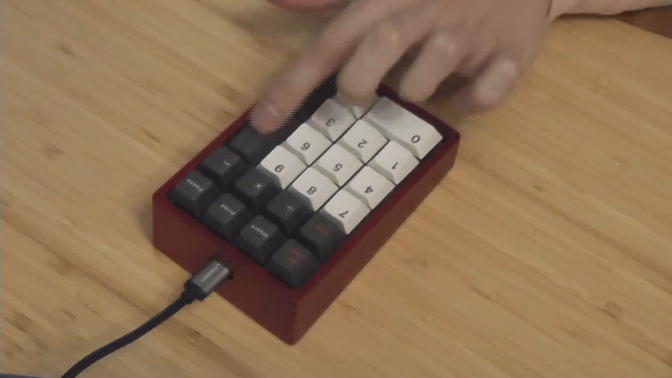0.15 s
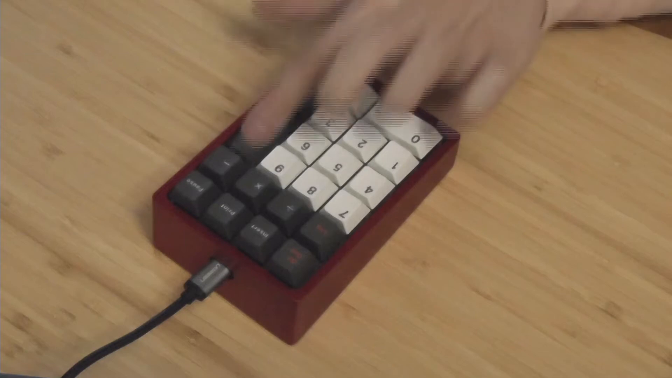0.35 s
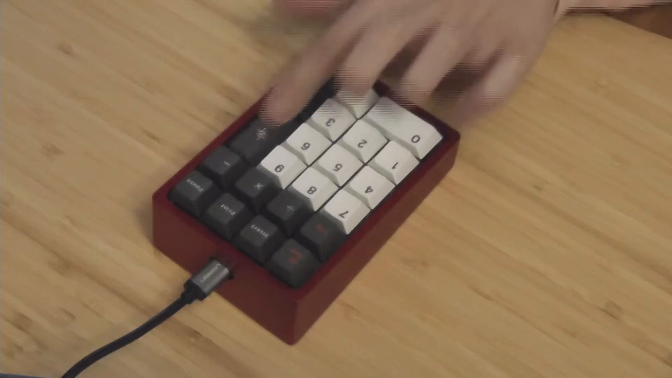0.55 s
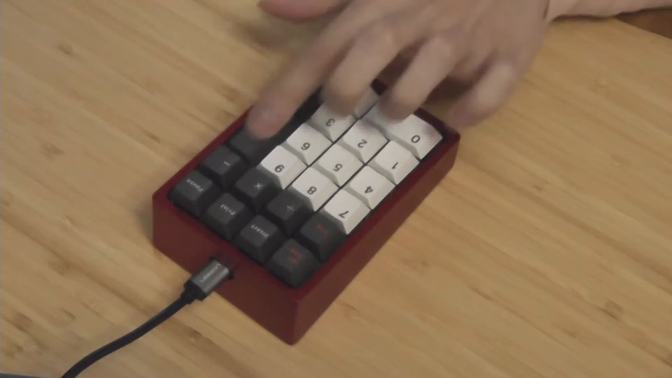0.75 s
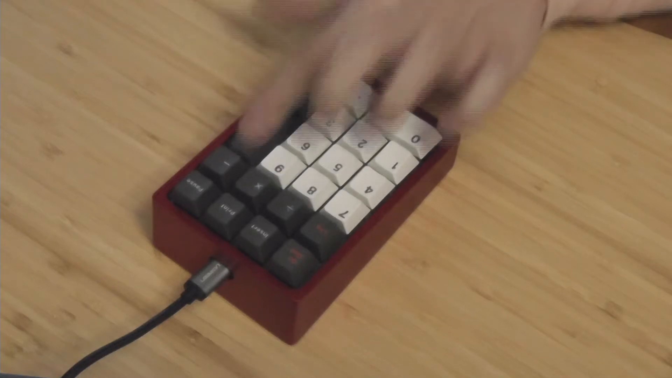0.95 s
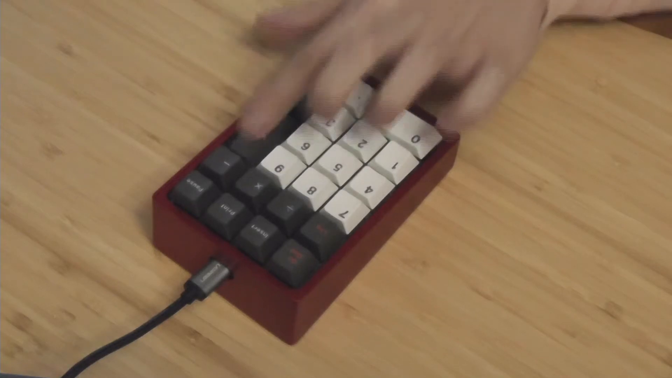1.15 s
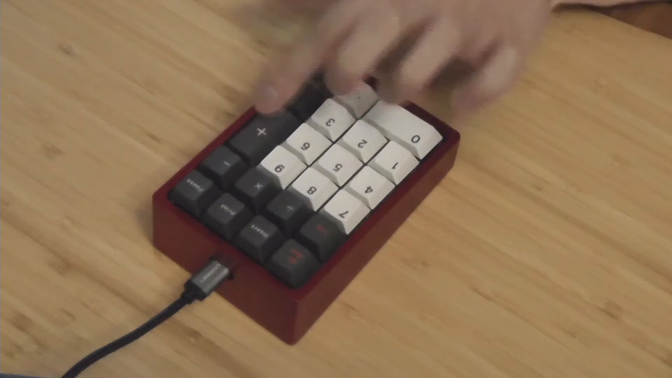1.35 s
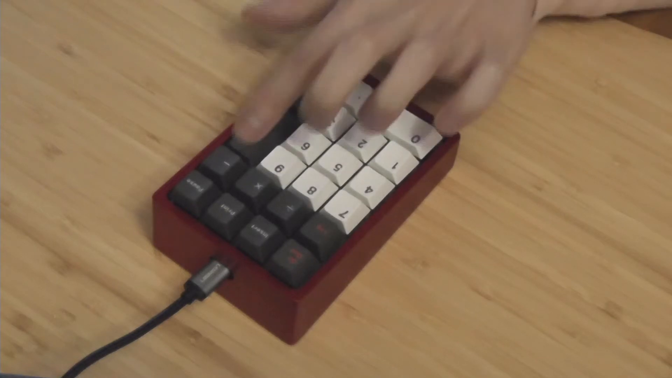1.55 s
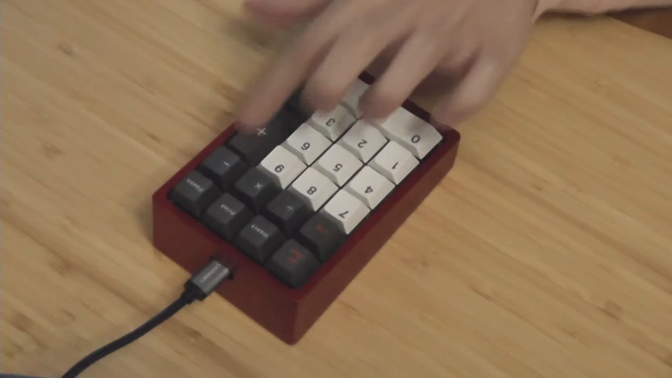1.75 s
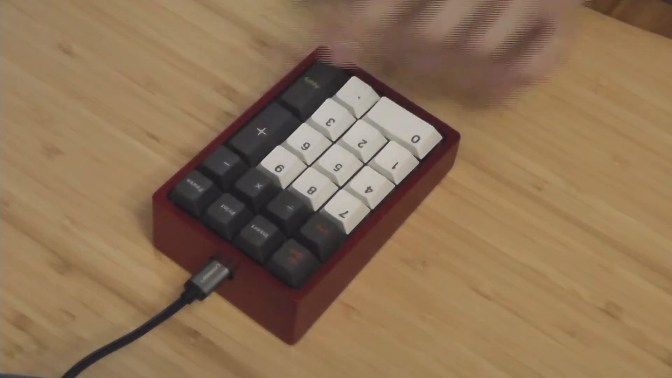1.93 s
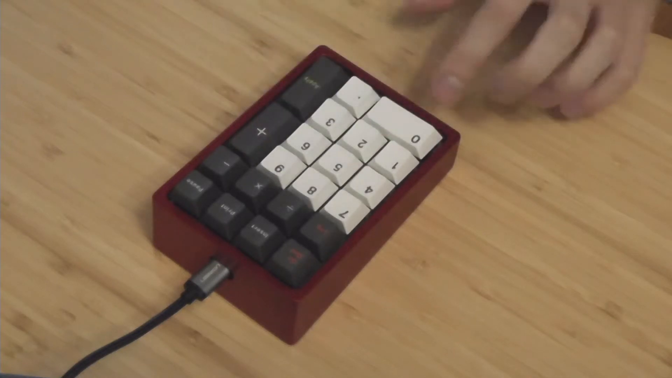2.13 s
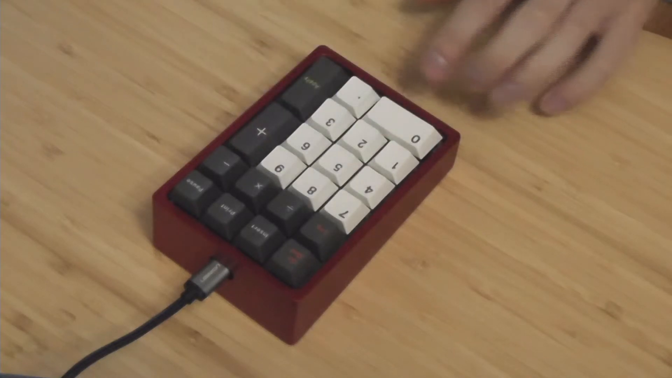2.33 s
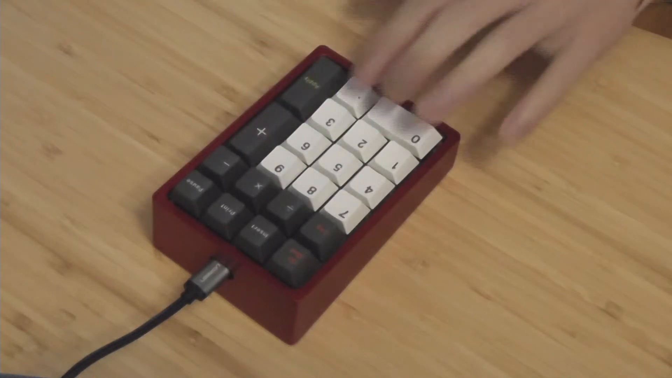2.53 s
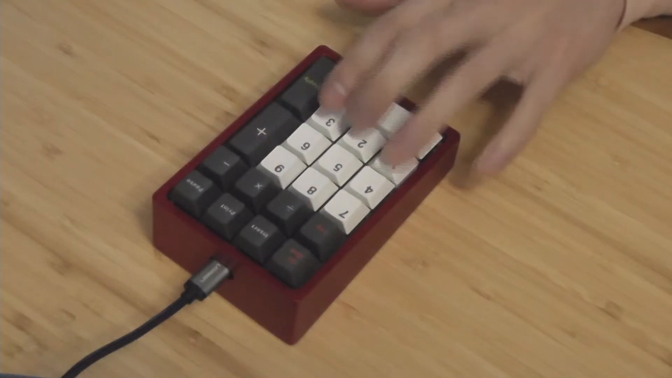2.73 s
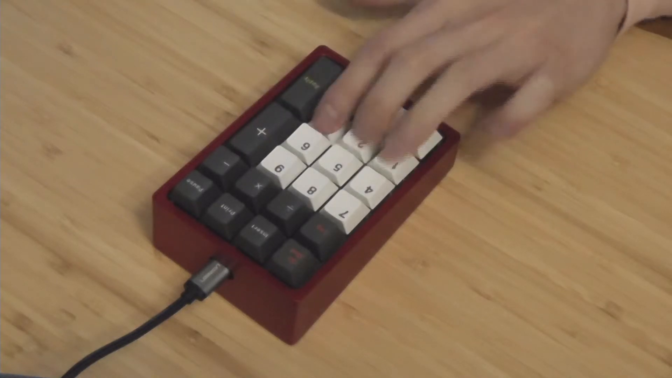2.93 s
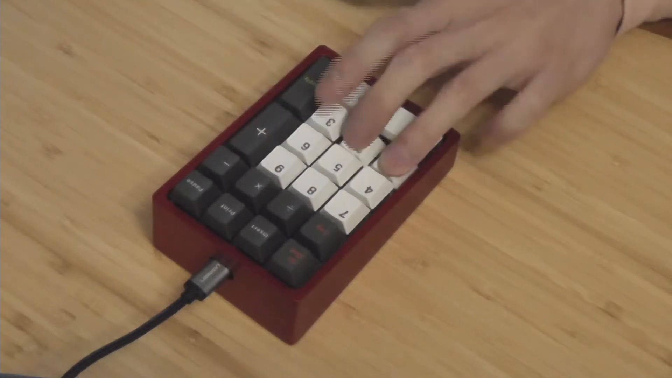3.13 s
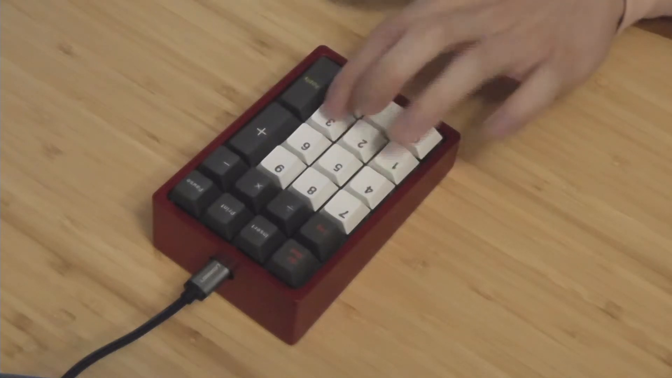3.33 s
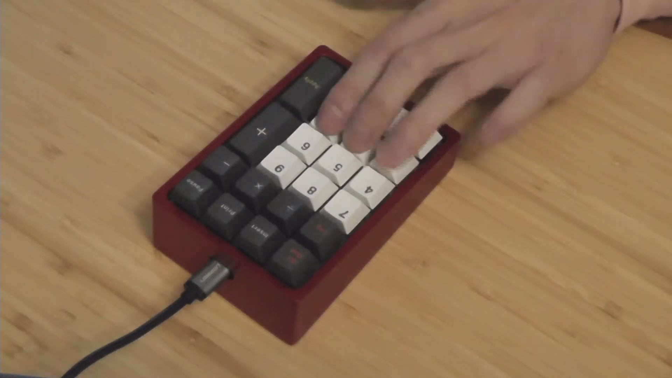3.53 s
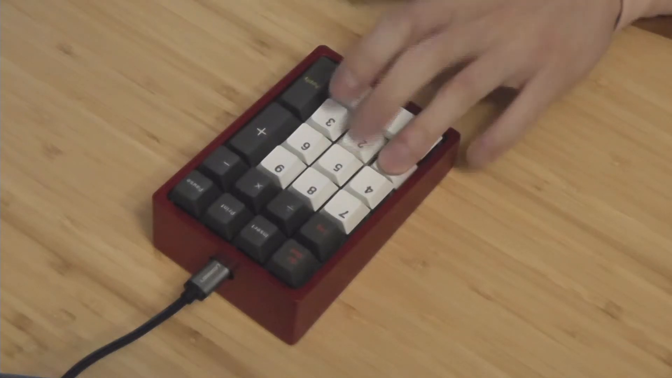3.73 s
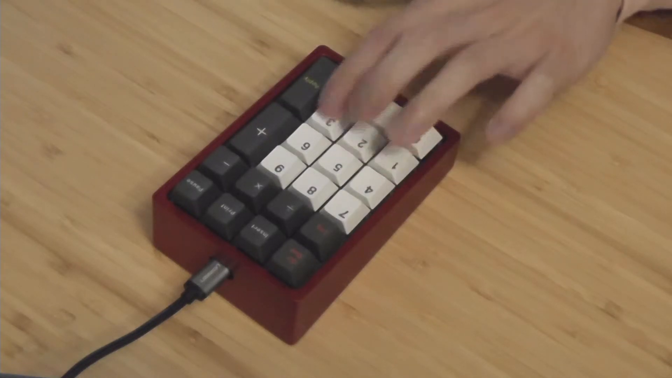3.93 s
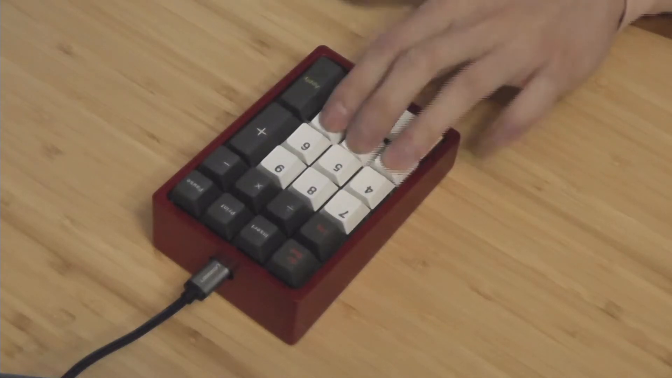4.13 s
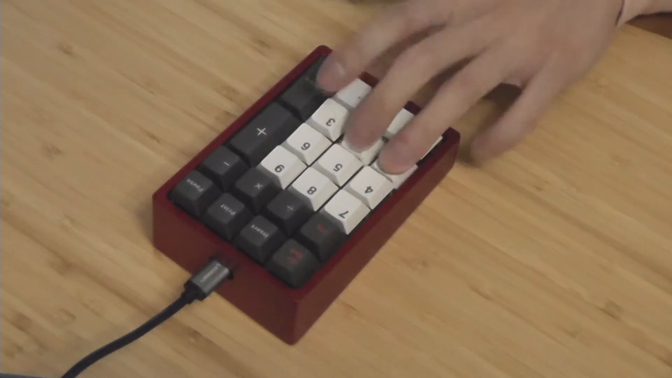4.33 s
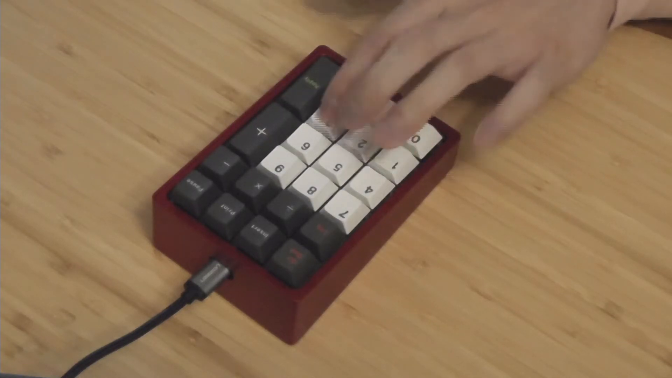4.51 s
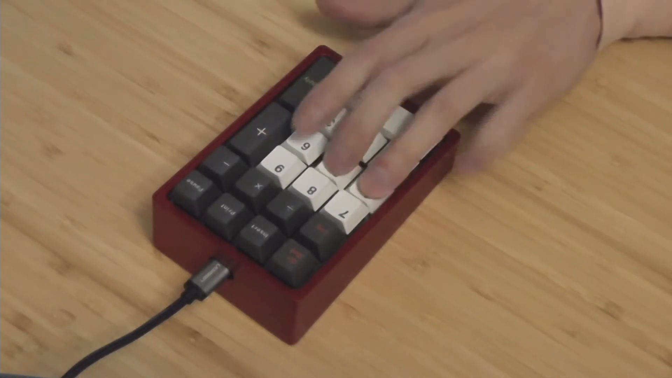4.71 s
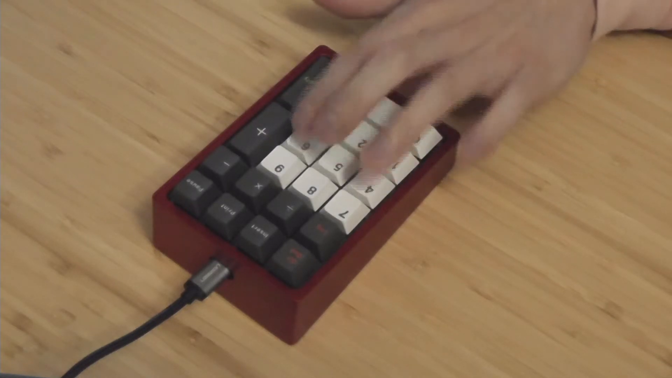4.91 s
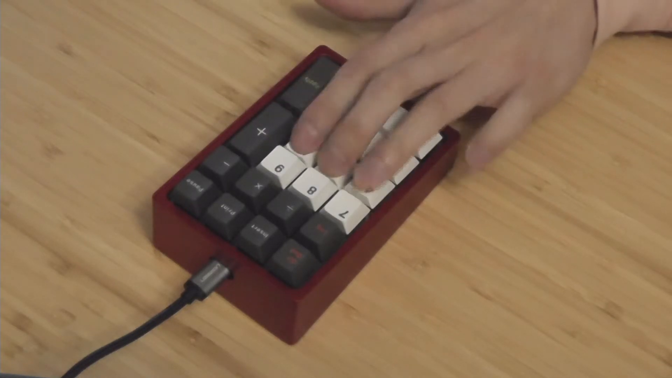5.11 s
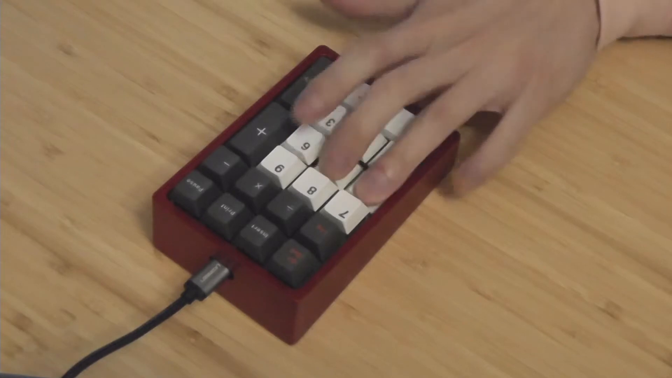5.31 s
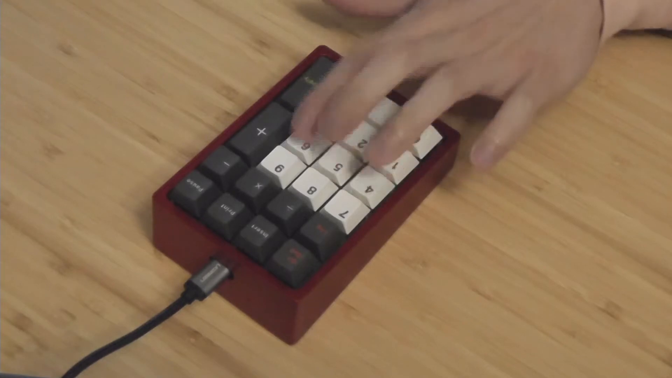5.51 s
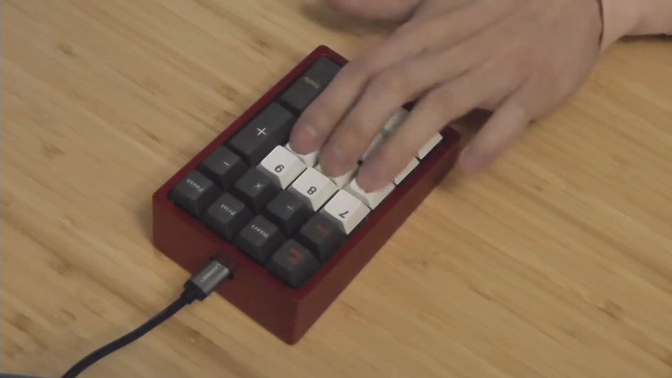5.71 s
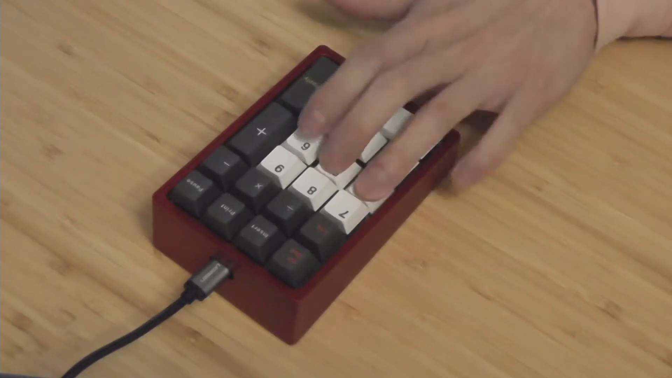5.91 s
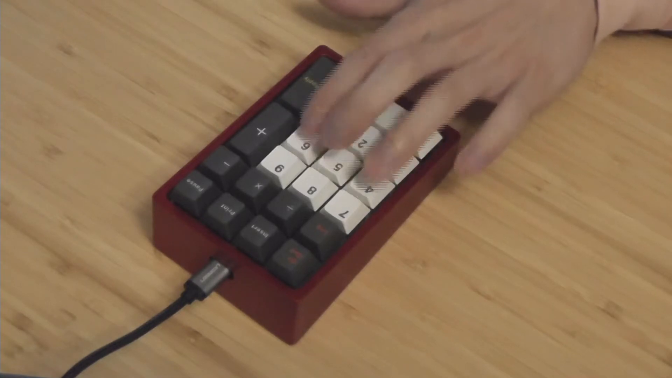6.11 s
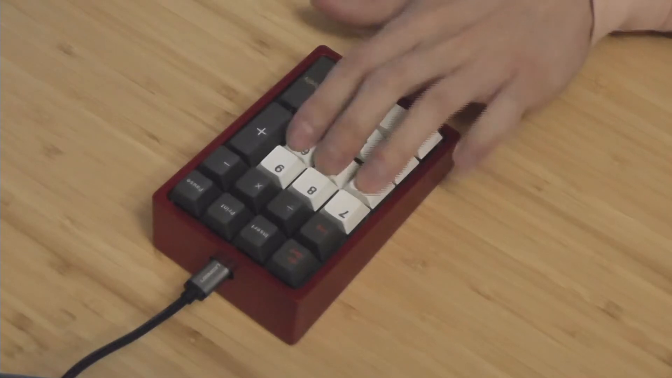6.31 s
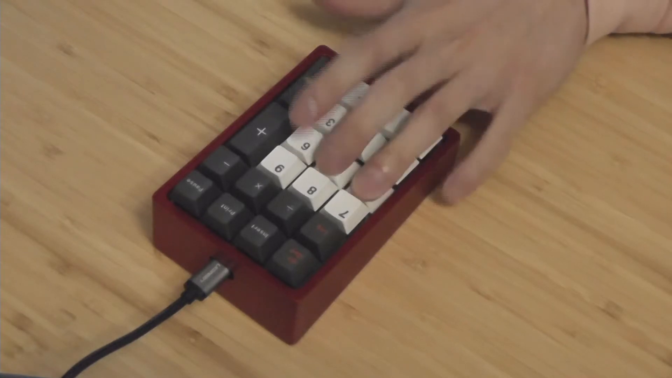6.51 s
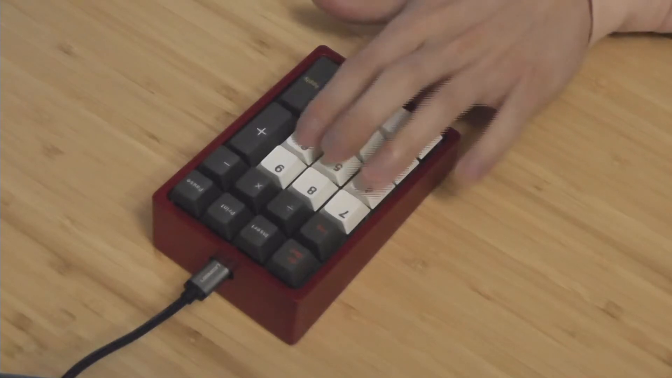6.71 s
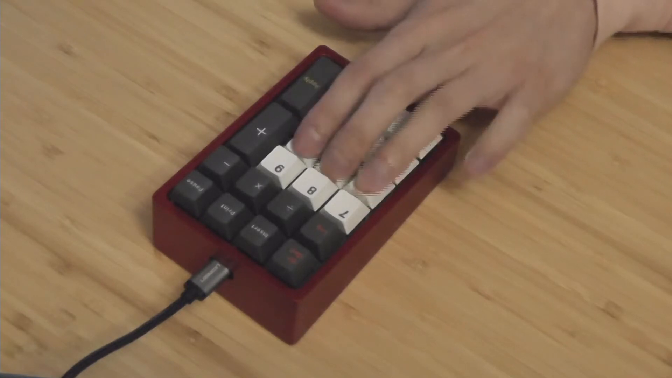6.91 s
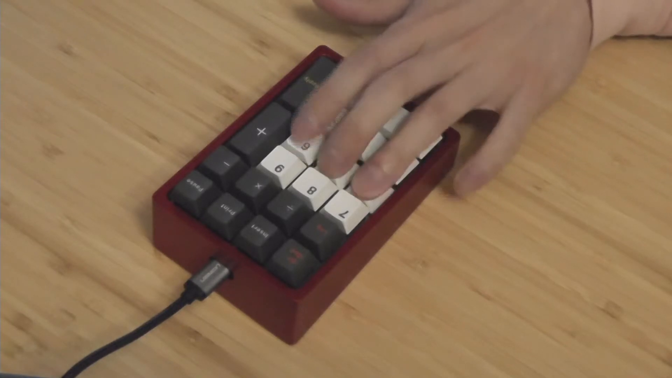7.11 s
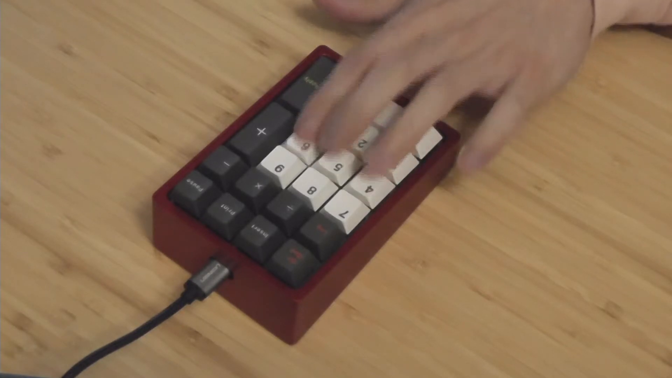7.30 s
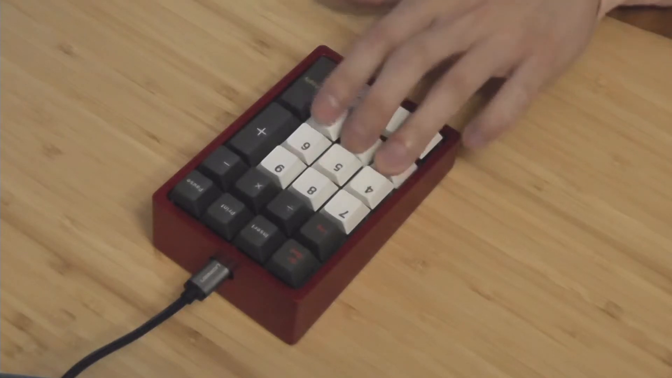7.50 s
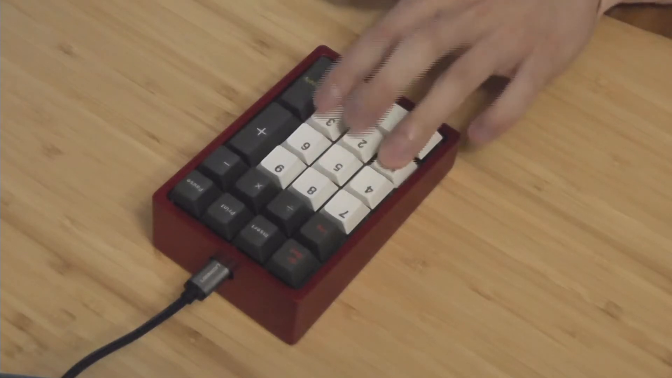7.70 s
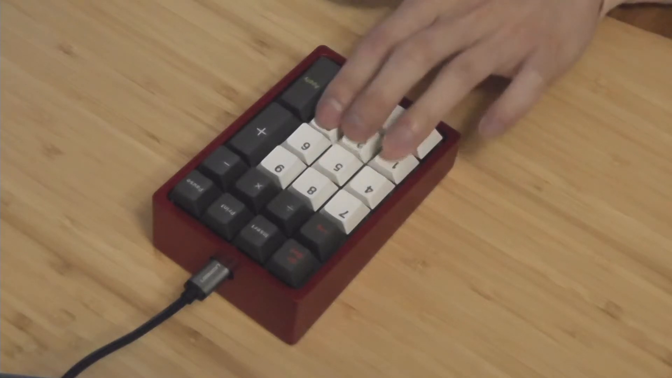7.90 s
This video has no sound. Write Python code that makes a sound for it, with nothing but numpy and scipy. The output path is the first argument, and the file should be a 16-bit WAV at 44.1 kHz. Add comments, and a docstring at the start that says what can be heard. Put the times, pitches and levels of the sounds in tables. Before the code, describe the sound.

Close typing on a mechanical keypad in a small, quiet room. It opens with a burst of loud, slightly rattly clacks from a single large key, then stops for a moment. Softer, irregular keystrokes follow in a near-continuous stream, easing off gradually. The strokes carry tiny switch ticks and faint spring pings, while the wooden desk adds soft knocks and a low rumble in the microphone.

```python
"""The wide plus key of a mechanical number pad clacks fast on a wooden desk; a pause, then runs of digits.
Each press and release is an impact that excites damped modes: the cap clacks, the switch ticks, its
spring pings and the desk thumps. The wide key's stabiliser buzzes. Around every stroke the fingertip
rubs and the case murmurs, more after harder strokes, and the digit keys' coils shimmer.
The desk shakes the stereo microphone; a near wall and a small room reflect the sound."""
import sys
import numpy as np
from scipy import signal
from scipy.fft import rfft, irfft, next_fast_len
from scipy.io import wavfile
from scipy.ndimage import uniform_filter1d, map_coordinates

SR = 44100
rng = np.random.default_rng(int(sys.argv[2]) if len(sys.argv) > 2 else 0)


def generate_wav(sig):
    """Save sig (samples, or channels by samples) to the path in sys.argv[1] as 16-bit PCM at SR."""
    pcm = np.round(np.clip(np.atleast_2d(sig).T, -1, 1) * 32767).astype(np.int16)
    wavfile.write(sys.argv[1], SR, pcm)


N = 350595
SIZE = 8192  # samples in one contact or impulse response
T = np.arange(SIZE) / SR
HZ = np.fft.rfftfreq(SIZE, 1 / SR)
TOP_HZ = 16300
USUAL_DB = -46  # a middling stroke

# Key contacts, down and up. Each row: start in seconds, cap level in dB, cap pitch in Hz,
# then switch, spring and desk thump levels in dB. Levels in all tables are relative.
PLUS_CONTACTS = [(0.0146, -54.5, 2610.0, -40, -62, -43), (0.0285, -36, 1930, -43.5, -55.5, -41.0),
                 (0.1148, -30, 2560, -33.5, -53, -44), (0.177, -37, 2110.0, -43.5, -61, -46),
                 (0.2594, -29, 2560, -28, -39.5, -36), (0.3007, -45.5, 2350, -66, -76.5, -59),
                 (0.3217, -36, 2140, -45.5, -60.5, -45.5), (0.3888, -28, 2440, -28.5, -46, -38),
                 (0.4588, -36, 2500, -43.5, -55, -42.5), (0.5477, -27, 2760, -28.5, -43, -36.5),
                 (0.6242, -41, 1960, -52.5, -74, -67), (0.68, -48.5, 2600, -44.5, -59.5, -51.5),
                 (0.7006, -37.5, 2060, -41.5, -58.5, -45), (0.7692, -42.5, 1890, -40, -66, -42),
                 (0.8589, -28.5, 2500, -22.5, -38.5, -33.5), (0.9234, -43.5, 2100, -53, -71.5, -67.5),
                 (0.9852, -48.5, 2210.0, -47, -53.5, -44), (0.9993, -34.5, 2200, -37.5, -52.5, -43.5),
                 (1.1565, -36, 2400, -58, -73.5, -47.5), (1.2283, -35, 2550, -36.5, -50.0, -43),
                 (1.3087, -30, 2320, -36.5, -44.5, -35.5), (1.382, -51, 1663, -56.5, -85, -61),
                 (1.428, -50.5, 2300.0, -58, -75.5, -72), (1.5484, -38, 2090.0, -44, -63, -43.5),
                 (1.6294, -48, 2070, -50, -77.5, -61.5)]
DIGIT_CONTACTS = [(2.6385, -42.5, 2160, -48, -55.5, -57.5), (2.714, -56.0, 2220, -57, -61.5, -49.5),
                  (2.7623, -38, 2600, -35.5, -43.5, -42), (2.8196, -40.5, 2260, -49.5, -55, -71),
                  (2.8565, -43, 2300, -52.5, -69.5, -50.5), (2.952, -37.5, 2520, -38, -45.5, -40.0),
                  (3.017, -43.5, 3020, -44.0, -52.5, -62.5), (3.077, -49, 2380, -46.0, -49.5, -44.5),
                  (3.1069, -48.5, 2460.0, -60, -74.0, -73), (3.1438, -44.5, 1970, -57.5, -68, -88),
                  (3.1859, -45, 2350, -58.5, -74, -61), (3.2746, -42.5, 2600, -46.5, -53.0, -38.0),
                  (3.3284, -50.5, 2580, -48.5, -58, -43.5), (3.4003, -38.5, 2280, -37.5, -45.5, -40.5),
                  (3.4631, -40, 2710, -44, -50.5, -53.0), (3.502, -41, 2370, -52, -60, -56),
                  (3.5977, -43.5, 2520.0, -46, -58, -37), (3.6401, -40.5, 2170, -36.5, -45, -39),
                  (3.7037, -48, 2950, -44.5, -57.5, -47.5), (3.743, -53.5, 2160, -56, -65, -82),
                  (3.7764, -42.5, 2650, -52, -61, -73), (3.8097, -39.5, 2860, -43.5, -56, -45.5),
                  (3.9, -37, 2520, -37.0, -44, -42), (3.9848, -49, 2920, -64, -76, -54),
                  (4.0008, -57, 2110.0, -61.0, -74, -53), (4.0383, -49.5, 2380, -63.0, -71, -55.5),
                  (4.0741, -43, 2460, -52.5, -69.5, -56), (4.11, -41.5, 2350, -50.5, -58, -45),
                  (4.183, -38.5, 2360, -41, -48.5, -42.5), (4.2292, -48.5, 3060, -49, -78.5, -48),
                  (4.289, -43, 2880, -46, -54, -45.5), (4.332, -53.5, 2360, -68.0, -83.0, -53),
                  (4.3639, -45.5, 2670, -57, -99, -53.5), (4.4001, -45.5, 2270.0, -53.5, -68, -50),
                  (4.5603, -30.5, 2470, -35.5, -40.5, -37), (4.6569, -61, 2080.0, -71, -90, -46),
                  (4.6801, -60, 2270.0, -77, -86, -63.5), (4.7019, -54, 2100.0, -71, -82, -48),
                  (4.7456, -44, 2520.0, -48.5, -56, -59), (4.7842, -43, 2230, -50.5, -63.5, -60),
                  (4.8743, -45, 2750, -62, -77, -62), (4.91, -55.5, 1880.0, -69, -71, -53),
                  (5.0123, -49.5, 1950, -64, -74.5, -54), (5.0601, -46, 2110, -55, -69, -52.5),
                  (5.0977, -40.0, 2200, -44.5, -54.5, -67), (5.1707, -43.5, 2180, -57.5, -72, -50.5),
                  (5.2236, -57.5, 2720, -61, -61.5, -48), (5.2917, -59.5, 2530.0, -66, -64.5, -51.5),
                  (5.3314, -49, 2470, -64, -89, -57), (5.3628, -45, 2440, -50.5, -59.5, -61.5),
                  (5.3969, -42.5, 1900, -45.5, -55, -52), (5.4811, -33.5, 3240, -34.5, -42, -35.5),
                  (5.5666, -57, 2260.0, -72.5, -76.0, -72), (5.5912, -58.0, 2160.0, -83, -76.5, -57.5),
                  (5.627, -51.5, 2250, -72.5, -75, -80), (5.6524, -43, 2420, -48.5, -53.5, -68),
                  (5.7062, -42, 2030, -57, -77, -79), (5.7692, -40, 2500, -50.5, -58.5, -52),
                  (5.82, -56.5, 1990.0, -60, -67, -49), (5.918, -55.5, 2160, -77, -90, -64),
                  (5.9499, -46.5, 2220, -59, -68, -53), (5.9901, -42, 2120, -57, -87, -63),
                  (6.1027, -53, 2010.0, -60.5, -70, -59), (6.1287, -63.5, 2110.0, -66, -77.5, -68.5),
                  (6.2229, -50.0, 2120, -76, -83, -62), (6.2619, -54.0, 2020, -81.0, -74, -72),
                  (6.2911, -45, 1800, -55, -73.0, -59), (6.3774, -45.5, 2700, -48.0, -52, -46.5),
                  (6.4314, -60, 4000, -64, -67, -50.5), (6.4606, -54.5, 2190.0, -64, -72.5, -53.5),
                  (6.5216, -58.5, 2100.0, -90.0, -101, -59), (6.5593, -49.5, 2640, -66, -82, -65.5),
                  (6.6021, -43.5, 2130, -67, -96, -63), (6.649, -58, 2460, -61.5, -72, -79),
                  (6.671, -48.5, 2480, -65, -79, -58), (6.6912, -60, 1780.0, -62.0, -74.5, -57.5),
                  (6.7154, -64, 3200.0, -65, -65.5, -66.0), (6.7489, -56, 2250, -69, -81, -67.5),
                  (6.8083, -50.5, 2420, -85, -91, -70), (6.8487, -50.5, 2160, -63, -76, -79),
                  (6.904, -53.5, 2060, -91.0, -94, -73), (6.9528, -45.0, 2400, -50, -56, -53),
                  (7.013, -65, 3160.0, -55.5, -59, -60), (7.0679, -67.0, 3160.0, -70.0, -66, -58),
                  (7.1279, -54.5, 2100, -86.5, -106, -60.0), (7.1515, -50.5, 2360.0, -57.5, -66, -77),
                  (7.2019, -47.5, 2230.0, -57.5, -77, -69), (7.2862, -64.5, 2240, -72, -77.0, -63.5),
                  (7.359, -46.5, 2660, -55, -71, -70.5), (7.4352, -56, 2950, -73, -88, -65),
                  (7.4522, -51, 2280, -65, -82.0, -80), (7.4951, -46.5, 2500, -73, -81, -82.5),
                  (7.5493, -51.5, 2770.0, -86, -87, -61.5), (7.5805, -60, 2660, -72, -87, -62.5),
                  (7.6252, -52.5, 2230.0, -63, -78.5, -72), (7.666, -48, 2470, -55, -78, -57),
                  (7.6966, -54, 2950, -74, -96, -54.5), (7.7234, -55, 2650, -66, -80, -51),
                  (7.7554, -53.5, 2280, -63, -92, -80), (7.8012, -53.5, 2600, -90, -93, -73),
                  (7.8829, -48, 2380, -57.5, -63.5, -58.5)]
# Resonant modes. Each row: centre in Hz, nominal width in Hz, level in dB.
PLUS_MODES = {"cap": [(1590, 490, -2), (1870, 400, 2), (2370, 300, 0.5), (3418, 1100, -7)],
              "tick": [(3900, 2400, -8.5), (5184, 1700, 0.5), (5300, 1300, 0), (7270, 2900, -16)],
              "spring": [(8300, 1200, 1.5), (10200, 1200, 0), (12500, 13000, -3), (15900, 1500, -9.5)],
              "desk": [(81, 22, 6), (147.2, 38, 1.5), (273, 10, -1), (358, 29, -11), (470, 140, -16.5),
              (690, 2000, -24.5)]}  # by part: cap, tick, spring, desk
DIGIT_MODES = {"cap": [(1720, 375, -6), (2088, 348, 0), (2188, 516, 0), (2813, 555, -6)],
               "tick": [(3670, 710, -5), (4950, 675, -0.5), (5310, 1400, -4.5), (7920, 800, -14)],
               "spring": [(9150, 550, 0), (9750, 550, 0), (10250, 450, -4)], "desk": [(78, 16.3, 2),
               (140.2, 22, 1.5), (170.8, 12.5, 1), (240, 32.3, -15), (359.6, 8.7, -22), (730, 960, -46)]}  # the same parts
SNAP_MODES = [(8500, 9000, 1), (11510, 4600, 4), (14800, 2300, -16)]  # a cap slammed home
DESK_MODES = [(137.6, 16, 4.5), (167, 15, -5.5), (245.6, 6.9, -10.5), (267, 20.6, -9)]
CASE_EDGE_MODES = [(253, 22, -1.5), (367.7, 20, -3.5), (389.7, 50, -1), (523.5, 67, -3), (690, 160, -9.5)]  # hollow case under the wide key
CASE_MIDDLE_MODES = [(362.7, 24, 8), (402, 78, -10.5), (530, 33, -5), (705, 76, -6)]  # and under the digits
# Spectra of the noises and of the room's tail. Each row: frequency in Hz, level in dB.
AIR_COLOUR = [(15, -33), (25, -2), (70, -10), (200, -26.5), (263, -13.5), (317, -36.5), (363, -10),
              (405, -32.5), (439, -22.5), (734, -41), (16000, -62)]
SWAY_COLOUR = [(8, -4), (16, -0.5), (30, -1), (42, -5.5), (58, -6), (76, -7.5), (100, -19), (150, -25.5),
               (250, -45.5), (800, -77), (2000, -120)]
ROOM_COLOUR = [(100, -4), (400, 13.5), (1000, 0.5), (2000, -8), (5000, -11.5), (10000, 0.5), (15000, 4)]
RUB_COLOUR = [(400, -22.5), (1000, -5), (1700, 1), (2700, 4.5), (4500, -1), (7500, -22), (11000, -32.5),
              (15000, -34.5)]
BRUSH_COLOUR = [(500, -14), (1000, -2), (1350, 4.5), (2300, -1), (4000, -15.5), (9000, -21), (15000, -47)]
COIL_COLOUR = [(5000, -45), (8300, -22), (9050, -1), (9850, 0), (10500, -14), (12000, -40), (13200, -21),
               (14500, -45)]
STEM_COLOUR = [(500, -13.5), (1000, -4.5), (1900, -2), (4000, -1.5), (7500, -6), (10000, -9.5),
               (11200, -21), (15000, -43)]
STABILISER_COLOUR = [(3000, -24.5), (4800, -10), (5750, 1.5), (6600, -7), (8000, -1), (10500, -5.5),
                     (13000, -8), (15500, -7)]
# Actions of the hand. Each row: time in seconds, level in dB.
HAND_WEIGHT = [(0, -46), (1.4, -42.5), (1.85, -48), (2.0, -61), (2.3, -67.5), (2.55, -61.5), (2.7, -56),
               (3.2, -58.5), (3.3, -42.5), (5.6, -45), (6.6, -47), (7.0, -53.5), (7.95, -58)]  # rocks the desk; lifts near 2 s, lightens towards the end
HAND_SHOVES = [(0.02, -37), (0.44, -37), (0.729, -35.5), (1.335, -30.5), (1.66, -35), (1.77, -34),
               (2.03, -48.5), (4.219, -39.5), (4.32, -37.5), (5.018, -36.5), (5.17, -35), (5.6, -43),
               (6.06, -43), (6.29, -40.5), (6.75, -46), (7.31, -48.5), (7.918, -44.5)]  # shifts of weight between strokes
FINGER_BRUSH = [(2.52, -120), (2.585, -80), (2.63, -57), (2.72, -70), (2.78, -120)]  # fingers land back on the caps
# Reverberation time. Each row: frequency in Hz, seconds to fall by 60 dB.
ROOM_T60 = [(200, 0.16), (800, 0.41), (2000, 0.29), (5500, .25), (10000, 0.14), (15000, 0.037)]
# Early echoes. Each entry: delay in seconds.
ECHO_DELAYS = [.0049, .0058, .0069, .0081, .026]
# Their strengths. Each row: left gain in dB, right gain in dB.
ECHO_DB = [(-29, -24), (-30.5, -8.5), (-19.5, -17.5), (-31, -17), (-35.5, -22)]
# Capsule balance. Each row: frequency in Hz, left minus right in dB.
CAPSULE_BALANCE = [(60, 5.2), (150, 5.7), (350, 2), (1300, 0.8), (2500, 0), (5000, -1), (8000, -1.8),
                   (14000, -2)]
# Capsule phase. Each row: frequency in Hz, lead of the left in radians.
CAPSULE_LEAD = [(300, -.1), (1500, 0.65), (2500, 0.96), (3700, 1.63), (5300, 1.86), (7000, 1.1),
                (16000, 1.5)]


def amp(db):
    """Decibels to amplitude ratio."""
    return 10 ** (np.asarray(db) / 20)


def unit(x):
    """Normalisation to rms 1."""
    return x / np.sqrt(np.mean(x ** 2) + 1e-20)


def along(points, hz):
    """Interpolation of (Hz, value) points on a log axis."""
    f, v = np.transpose(points)
    return np.interp(np.log(hz + 1), np.log(f + 1), v)


def curve(rows):
    """Interpolation of (seconds, value) rows at every sample."""
    return np.interp(np.arange(N) / SR, *np.transpose(rows))


def filtered(x, response):
    """Linear filtering: the spectrum times a frequency response."""
    m = next_fast_len(N + SR // 2)
    return irfft(rfft(x, m) * response(np.fft.rfftfreq(m, 1 / SR)), m)[..., :N]


def noise(colour):
    """Spectrally shaped stereo noise of rms 1."""
    return unit(filtered(rng.standard_normal((2, N)), lambda hz: amp(along(colour, hz))))


def wobble(rate):
    """Random modulation: a spline through rate knots a second."""
    knots = rng.standard_normal(int(N * rate / SR) + 4)
    coarse = np.arange(0, N + 32, 32)
    return np.interp(np.arange(N), coarse, map_coordinates(knots, [coarse * rate / SR]))


def wake(times, stroke_db, grows, rise_s, fall_s):
    """Exponential rise and decay about each stroke, which gains grows dB per dB; powers add."""
    power = np.bincount(np.round(times * SR).astype(int), amp(grows * (stroke_db - USUAL_DB)) ** 2, N)[:N]
    fade = lambda p, life: signal.lfilter([1], [1, -np.exp(-1 / (life * SR))], p)
    return np.sqrt(fade(power, fall_s) + fade(power[::-1], rise_s)[::-1] - power + 1e-20)


def impacts(count, chatter, t60, rattle=0, rattle_t60=0.17):
    """Contact forces: an impulse, plastic chattering on plastic, then loose little knocks."""
    unit_energy = lambda x: x / np.linalg.norm(x, axis=1, keepdims=True)
    force = chatter * unit_energy(rng.standard_normal((count, SIZE)) * amp(-60 * T / t60))
    knocks = rng.standard_normal((count, SIZE))
    force += rattle * unit_energy(knocks * np.abs(knocks) * amp(-60 * T / rattle_t60))
    force[:, 0] += 1
    return force


def resonances(hz, modes):
    """Modal superposition: damped resonators, neighbours in opposite phase."""
    return sum((-1) ** k * amp(db) * 1j * hz * width / (centre ** 2 - hz ** 2 + 1j * hz * width)
               for k, (centre, width, db) in enumerate(modes))


def ring(force, modes, band_hz, detune, scatter_db, stretch=1, tilt_db=0):
    """Forced response of modes that vary with each contact; tilt_db per octave favours the upper ones."""
    chance = rng.standard_normal((len(force), len(modes), 2))
    varied = [(hz * stretch * (1 + detune * chance[:, k, :1]), width,
               db + scatter_db * chance[:, k, 1:] + tilt_db * np.log2(hz / modes[0][0]))
              for k, (hz, width, db) in enumerate(modes)]
    taper = np.minimum(1, 4 * (1 - T / T[-1])) ** 2
    sound = irfft(rfft(force) * resonances(HZ, varied)) * taper
    # a part radiates little outside the range of its modes
    return signal.sosfilt(signal.butter(2, band_hz, "band", fs=SR, output="sos"), sound)


def place(sounds, times, db, span_s):
    """Superposition in time, each sound at its rms level over its first span_s."""
    power = np.sum(sounds ** 2 * np.clip((span_s - T) * SR, 0, 1), axis=1) / (span_s * SR)
    scaled = sounds * (amp(db) / np.sqrt(power))[:, None]
    index = np.round(times * SR).astype(int)[:, None] + np.arange(SIZE)
    return np.bincount(index.ravel(), scaled.ravel(), N)[:N]


def still_air(db):
    """Ambient noise: the steady floor of a quiet room."""
    return noise(AIR_COLOUR) * amp(db)


def desk_sway(rows, weight_db, restless_db, push_db, shove_db, shove_top_hz):
    """Structure-borne sound: the hand's weight, thumps and shoves rock the desk and microphone stand."""
    times, *_, thump_db = np.transpose(rows)
    smooth = lambda x: uniform_filter1d(x, size=3000)
    envelope = lambda x: np.sqrt(np.abs(smooth(smooth(x ** 2))) + 1e-6)
    even = lambda x: unit(x / envelope(x) ** 0.96)
    quick, slow = noise(SWAY_COLOUR)
    slow = filtered(slow, lambda hz: 1 / (1 + (hz / shove_top_hz) ** 4))
    resting = amp(curve(HAND_WEIGHT) + weight_db + restless_db * wobble(rate=8.8))
    pushes = amp(push_db) * wake(times, thump_db, grows=1.0, rise_s=0.011, fall_s=0.036)
    shoves = amp(shove_db) * wake(*np.transpose(HAND_SHOVES), grows=0.95, rise_s=0.014, fall_s=0.032)
    return even(quick) * np.hypot(resting, pushes) + even(slow) * shoves


def microphone(x):
    """Interchannel level and phase differences; the desk shakes the left capsule more."""
    half = np.array([[0.5], [-0.5]])
    gain = lambda hz: amp(half * along(CAPSULE_BALANCE, hz))
    return filtered(x, lambda hz: gain(hz) * np.exp(1j * half * along(CAPSULE_LEAD, hz)))


def room(x, early_db, early_t60, late_db, onset_s, count=40):
    """Scattering from the hand and things near by, then reverberation; paths change as the hand moves."""
    hz, t, spectra = signal.stft(rng.standard_normal((count, 2, SIZE)), SR, nperseg=256)
    fade = amp(along(ROOM_COLOUR, hz)[:, None] - 60 * t / along(ROOM_T60, hz)[:, None])
    tail = signal.istft(spectra * fade, SR, nperseg=256)[1][..., :SIZE]
    scatter = rng.standard_normal(tail.shape) * amp(-60 * T / early_t60)
    arrive = lambda h, db: amp(db) * unit(h * np.clip(T / onset_s - 1, 0, 1)) / np.sqrt(SIZE)
    hop = N // (count - 1) + 1
    padded = np.pad(x, (hop, 2 * hop))
    wet = np.zeros((2, N + 3 * hop + SIZE))
    # overlapping pieces each meet their own impulse response
    for k, paths in enumerate(arrive(scatter, early_db) + arrive(tail, late_db)):
        piece = padded[k * hop:][:2 * hop] * np.sqrt(np.hanning(2 * hop))
        wet[:, k * hop:][:, :2 * hop + SIZE - 1] += signal.fftconvolve(piece[None], paths, axes=1)
    return wet[:, hop:hop + N]


def wall_echoes(x):
    """Early reflection: the near wall and the furniture return delayed, weaker copies."""
    return filtered(x, lambda hz: sum(amp(db)[:, None] * np.exp(-2j * np.pi * hz * delay)
                                      for delay, db in zip(ECHO_DELAYS, ECHO_DB)))


def murmur(modes, uneven_db, rate):
    """Random excitation: irregular pushing makes each mode swell and fade by itself; rms 1."""
    total = 0
    for centre, width, db in modes:
        peak = np.concatenate(signal.iirpeak(centre, centre / (2 * width), fs=SR))
        drone = unit(signal.sosfilt([peak, peak], rng.standard_normal(N)))
        total += drone * amp(db + uneven_db * wobble(rate))
    return unit(total)


def desk_and_case(rows, case_modes, desk_db, case_db, case_grows):
    """Forced vibration: around each stroke the finger keeps the desk top and hollow case murmuring."""
    times, *_, thump_db = np.transpose(rows)
    desk = murmur(DESK_MODES, uneven_db=4.0, rate=13)
    desk *= wake(times, thump_db, grows=0.66, rise_s=0.0091, fall_s=0.052)
    case = murmur(case_modes, uneven_db=6.0, rate=9.1)
    case *= wake(times, thump_db, case_grows, rise_s=0.046, fall_s=0.063)
    return amp(desk_db) * desk + amp(case_db) * case


def coil_shimmer(rows, db, flutter_db):
    """Stick-slip: the coils catch as the keys travel and shimmer unevenly in a narrow band."""
    times, *_, spring_db, _ = np.transpose(rows)
    travel = wake(times, spring_db, grows=0.34, rise_s=0.0027, fall_s=0.04)
    return unit(noise(COIL_COLOUR) * amp(flutter_db * wobble(rate=41))) * travel * amp(db)


def fingertips(plus_db, digit_db, grain_db):
    """Friction: skin drags over the caps in tiny catches, at each stroke and as the fingers land again."""
    times, cap_db, *_ = np.transpose(PLUS_CONTACTS)
    sliding = amp(plus_db) * wake(times, cap_db, grows=0.66, rise_s=0.009, fall_s=0.013)
    times, cap_db, *_ = np.transpose(DIGIT_CONTACTS)
    sliding += amp(digit_db) * wake(times, cap_db, grows=0.41, rise_s=0.0038, fall_s=0.021)
    rub = noise(RUB_COLOUR) * sliding
    brush = noise(BRUSH_COLOUR) * amp(curve(FINGER_BRUSH))
    return (rub + brush) * unit(amp(grain_db * wobble(rate=770)))


def stem_scrapes(rows, db, lead_s, rise_db):
    """Sliding friction: just before it lands, the stem scrapes along its housing."""
    times, _, _, switch_db, *_ = np.transpose(rows)
    swell = amp(rise_db * np.minimum(T / lead_s, 1)) * np.clip((lead_s - T) * SR, 0, 1)
    scrapes = rng.standard_normal((len(times), SIZE)) * swell
    track = place(scrapes, np.maximum(times - lead_s, 0), switch_db + db, lead_s)
    return filtered(track, lambda hz: amp(along(STEM_COLOUR, hz)))


def stabiliser(db, grain_db):
    """Contact rattle: the wide key's wire buzzes in its clips at each contact and for a moment after."""
    times, _, _, switch_db, *_ = np.transpose(PLUS_CONTACTS)
    buzz = unit(noise(STABILISER_COLOUR) * amp(grain_db * wobble(rate=520)))
    return buzz * amp(db) * wake(times, switch_db, grows=0.79, rise_s=0.00097, fall_s=0.014)


def desk_thumps(rows, parts, db, top_hz):
    """Mechanical coupling: each contact pushes the case into the desk top and excites its low modes."""
    times, *_, thump_db = np.transpose(rows)
    force = impacts(len(times), chatter=0.33, t60=0.02)
    knocks = ring(force, parts["desk"], band_hz=(44, top_hz), detune=0.0052, scatter_db=2.0)
    return place(knocks, times, thump_db + db, span_s=0.016)


def keys(rows, parts, usual_hz, ping_db, ping_top_hz, snap_db, snap_grows, rattle):
    """Impact excitation: every contact rings the cap, the switch and its spring; hard ones also snap."""
    times, cap_db, pitch_hz, switch_db, spring_db, _ = np.transpose(rows)
    count = len(times)
    # a higher clack is a stiffer hit: the modes rise a little and the upper ones take over
    height = pitch_hz[:, None] / usual_hz
    clacks = ring(impacts(count, chatter=0.79, t60=0.022, rattle=rattle), parts["cap"],
                  band_hz=(1035, 4855), detune=0.01, scatter_db=2.0,
                  stretch=height ** 0.082, tilt_db=26 * np.log(height))
    ticks = ring(impacts(count, chatter=2.1, t60=0.011, rattle=3.0 * rattle), parts["tick"],
                 band_hz=(2560, 7830), detune=0.035, scatter_db=-0.33)
    pings = ring(impacts(count, chatter=2.9, t60=0.02, rattle=4.5 * rattle), parts["spring"],
                 band_hz=(7740, ping_top_hz), detune=0.026, scatter_db=4.0)
    snaps = ring(impacts(count, chatter=3, t60=0.027, rattle=1.2, rattle_t60=0.2), SNAP_MODES,
                 band_hz=(5995, 16700), detune=0.04, scatter_db=3)
    # the contact shortens with force, so the snap grows faster than the spring's ping
    snap_levels = snap_db + snap_grows * (spring_db - USUAL_DB)
    return (place(clacks, times, cap_db + 0.5, span_s=0.0054)
            + place(ticks, times, switch_db + 0.5, span_s=0.0046)
            + place(pings, times, spring_db + ping_db, span_s=0.0069)
            + place(snaps, times, snap_levels, span_s=0.004))


def scene():
    """Superposition of the keys, their reflections, the desk's rumble and the still air."""
    pad = keys(PLUS_CONTACTS, PLUS_MODES, usual_hz=2150, ping_db=0.5, ping_top_hz=17000,
               snap_db=-51.5, snap_grows=1.5, rattle=0.16)
    pad += keys(DIGIT_CONTACTS, DIGIT_MODES, usual_hz=2130, ping_db=-0.5, ping_top_hz=11360,
                snap_db=-48, snap_grows=1.7, rattle=0.25)
    pad += stem_scrapes(PLUS_CONTACTS, db=-13.5, lead_s=0.011, rise_db=17)
    pad += stem_scrapes(DIGIT_CONTACTS, db=-6.5, lead_s=0.0064, rise_db=11)
    desk = desk_thumps(PLUS_CONTACTS, PLUS_MODES, db=-4.5, top_hz=1210)
    desk += desk_and_case(PLUS_CONTACTS, CASE_EDGE_MODES, desk_db=-60.5, case_db=-69, case_grows=0.25)
    desk += desk_thumps(DIGIT_CONTACTS, DIGIT_MODES, db=-1.5, top_hz=1110)
    desk += desk_and_case(DIGIT_CONTACTS, CASE_MIDDLE_MODES, desk_db=-57.5, case_db=-80, case_grows=0.15)
    sound = pad + desk + wall_echoes(pad)
    sound += room(pad + amp(-6.5) * desk, early_db=-5.5, early_t60=0.045, late_db=-7, onset_s=0.002)
    sound += desk_sway(np.vstack([PLUS_CONTACTS, DIGIT_CONTACTS]), weight_db=-2.5, restless_db=0.44,
                       push_db=-45, shove_db=-44, shove_top_hz=68)
    sound += coil_shimmer(DIGIT_CONTACTS, db=-70.5, flutter_db=4.5)
    buzz = stabiliser(db=-65.5, grain_db=3.5)
    skin = fingertips(plus_db=-70, digit_db=-65, grain_db=4.0)
    return microphone(sound) + buzz + skin + still_air(db=-74.5)


def record(dry):
    """Band limiting: an ideal low-pass filter removes everything above TOP_HZ."""
    return filtered(dry, lambda hz: hz < TOP_HZ)


dry = scene()
out = record(dry)
generate_wav(out)
```